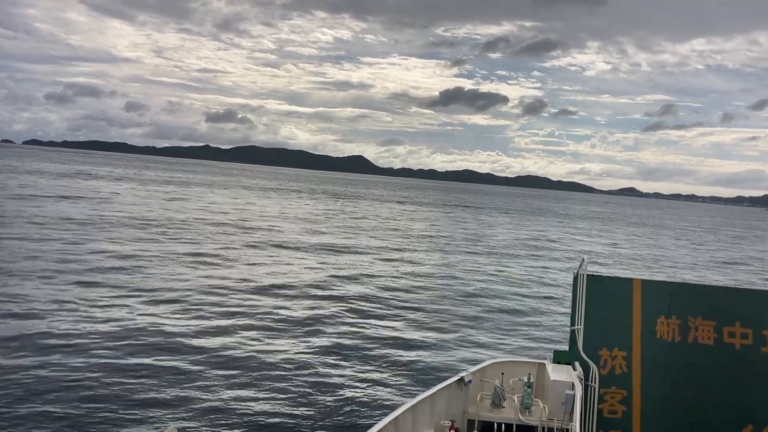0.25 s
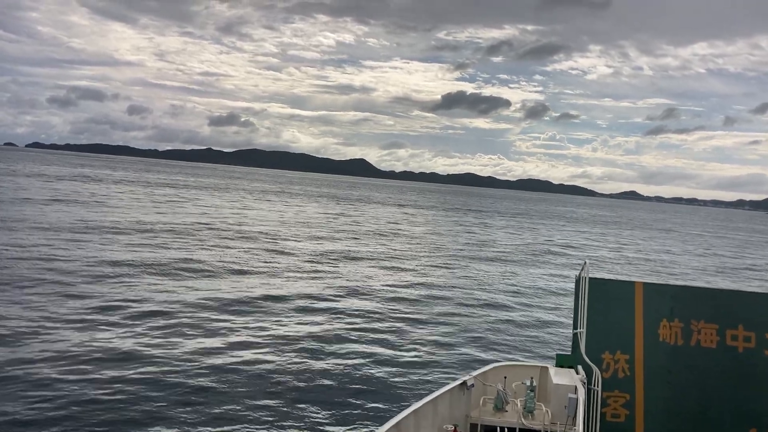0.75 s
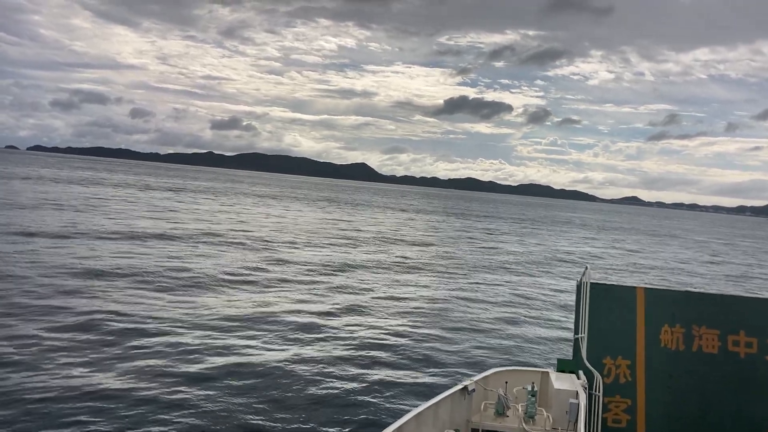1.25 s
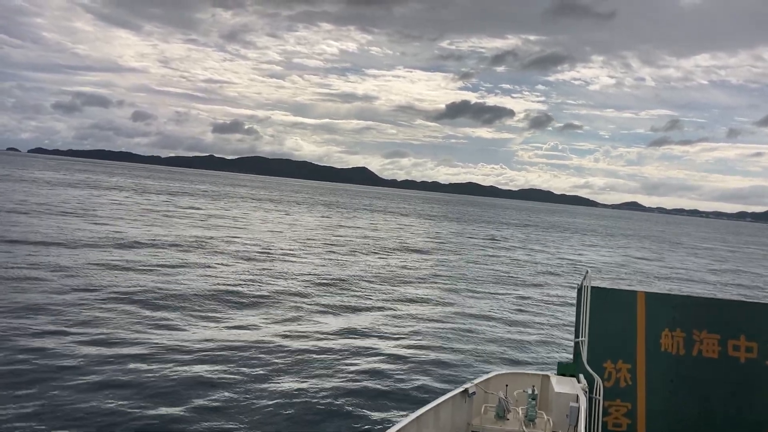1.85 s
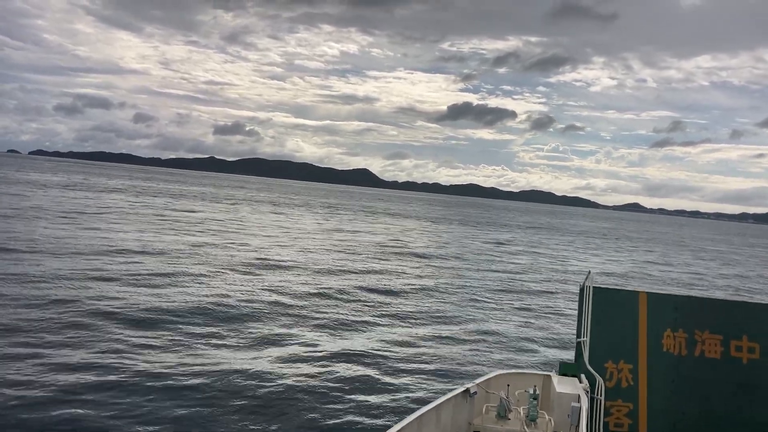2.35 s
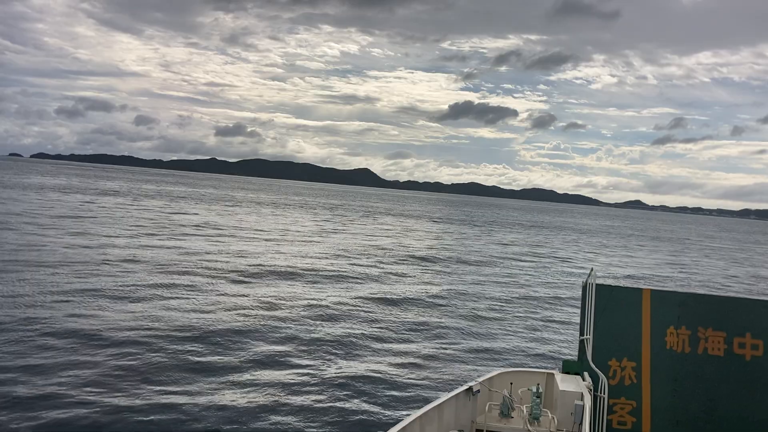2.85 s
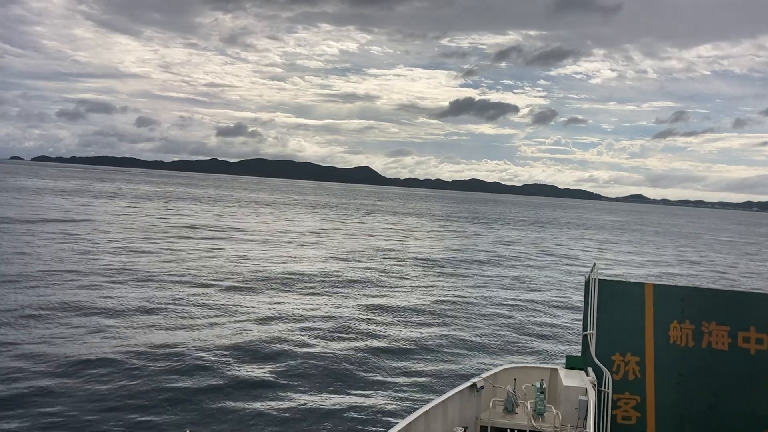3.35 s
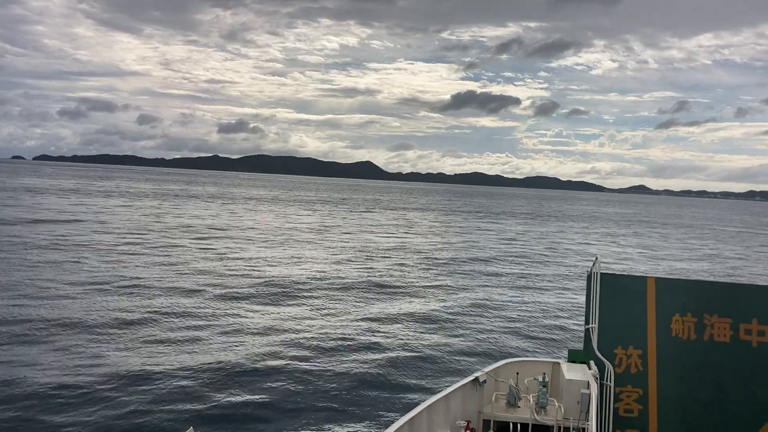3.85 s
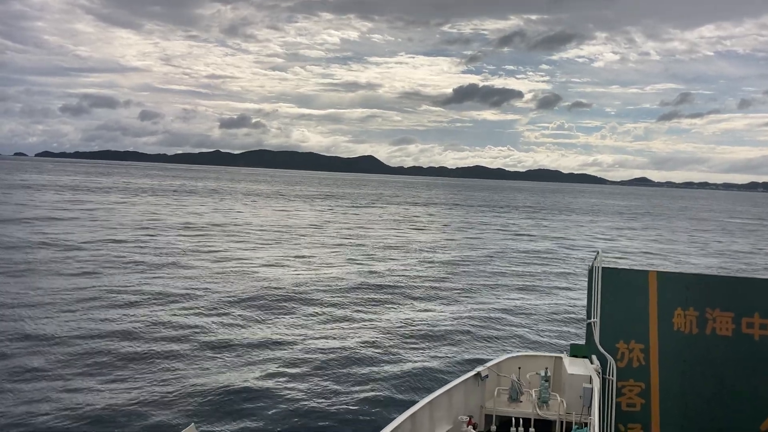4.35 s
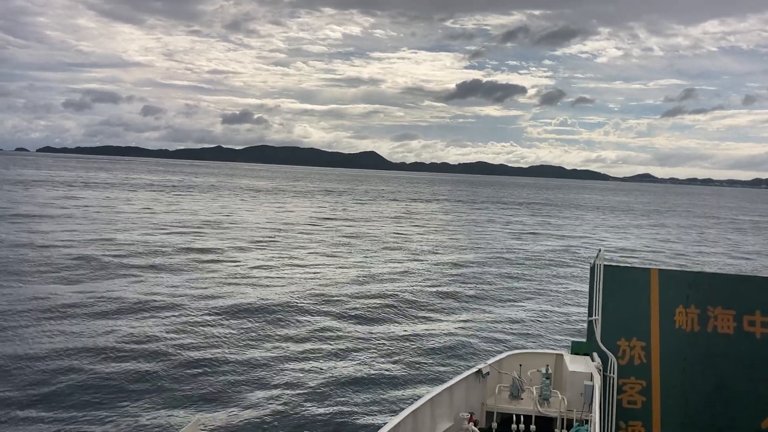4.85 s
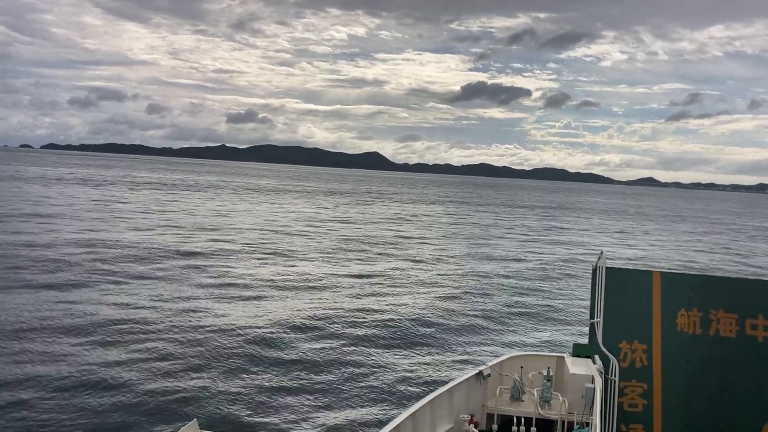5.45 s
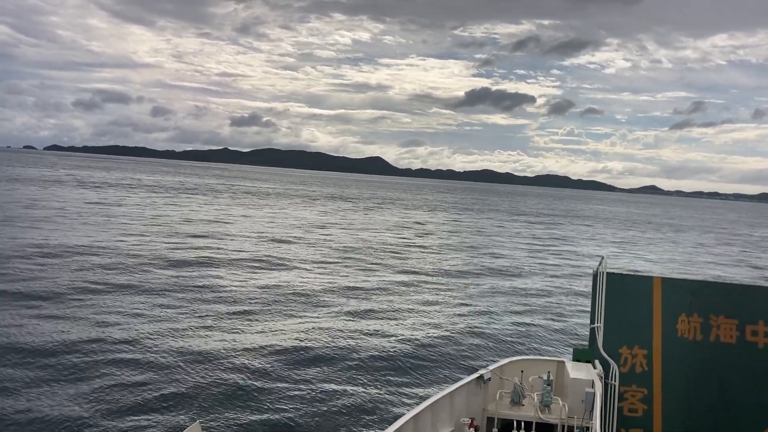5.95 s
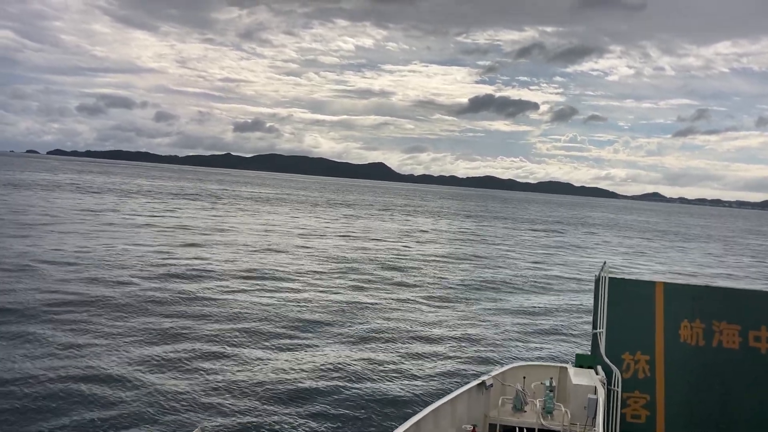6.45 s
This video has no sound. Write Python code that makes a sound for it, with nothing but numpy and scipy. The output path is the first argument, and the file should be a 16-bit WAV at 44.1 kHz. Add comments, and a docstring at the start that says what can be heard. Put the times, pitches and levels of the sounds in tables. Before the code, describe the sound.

Deep diesel ferry engine drones and chugs steadily with a slow throb, while water washes softly along the hull with faint hisses of spray.

```python
"""On the open deck of a ferry under way. A six-cylinder diesel drones and chugs through the funnel,
and its strongest tone beats against that of a faster generator set, which makes a throb.
Rough exhaust noise, shaped from random noise, and narrow fan and gear whines spread over the steel deck.
Bands of noise make the water washing along the hull, hisses of spray on the right and single splashes.
A blower holds a thin flickering tone, and there is one tiny squeak."""
import sys
import numpy as np
from scipy import signal
from scipy.fft import rfft, irfft
from scipy.io import wavfile
from scipy.ndimage import uniform_filter1d

SR = 44100
rng = np.random.default_rng(int(sys.argv[2]) if len(sys.argv) > 2 else 0)


def master(y):
    """Save y as 16-bit WAV."""
    cut = np.clip(np.atleast_2d(y).T, -1, 1)
    pcm = np.round(cut * 32767)  # scale
    wavfile.write(sys.argv[1], SR, pcm.astype(np.int16))


N = 295470
TIME_S = np.arange(N) / SR
BIN_HZ = np.arange(N // 2 + 1) * SR / N  # frequency of every spectral bin
EAR_LAG_S, EAR_SPACING_M, SOUND_SPEED_M_PER_S = .000269, 0.13, 343
TOP_HZ = 15500  # nothing is heard above this


def undb(db):
    """Turn decibels into a gain."""
    return 10 ** (np.asarray(db) / 20)


def colour(points):
    """Join (pitch_hz, level_db) points on a log pitch axis, giving dB for every bin."""
    hz, db = np.transpose(points)
    return np.interp(np.log(BIN_HZ + 1e-9), np.log(hz), db)


def walk(rate_hz):
    """Smooth random wandering with spread 1, changing about rate_hz times a second."""
    hold = int(SR / rate_hz)
    steps = np.repeat(rng.standard_normal(N // hold + 3), hold)
    smooth = uniform_filter1d(uniform_filter1d(steps, hold), hold)
    wander = smooth[rng.integers(hold):][:N]
    return wander / wander.std()


def swell(top_s, rise_s, fall_s):
    """A smooth bell-shaped rise to 1 and a fall back."""
    from_top = TIME_S - top_s
    return np.exp(-(from_top / np.where(from_top < 0, rise_s, fall_s)) ** 2)


def noise():
    """Spectrum of white noise at 0 dB per Hz."""
    return rfft(rng.standard_normal(N)) * np.sqrt(SR / 2)


def from_right(spectrum):
    """Sound from the right reaches the left ear a little later."""
    late = spectrum * np.exp(-2j * np.pi * BIN_HZ * EAR_LAG_S)
    return irfft(np.array([late, spectrum]), N)


def from_all_round(gain, likeness):
    """Noise from every direction: the ears agree best for waves much longer than their spacing."""
    alike = likeness * np.sinc(2 * BIN_HZ * EAR_SPACING_M / SOUND_SPEED_M_PER_S)
    shared = irfft(gain * noise() * np.sqrt((1 + alike) / 2), N)
    opposed = irfft(gain * noise() * np.sqrt((1 - alike) / 2), N)
    return np.array([shared + opposed, shared - opposed])


def squeak():
    """One tiny squeak: a short sine swell with a slightly wavering pitch."""
    hz = 3600 + 12 * walk(79)
    tone = np.sqrt(2) * np.sin(2 * np.pi * np.cumsum(hz) / SR)
    return undb(-62.5) * swell(5.856, rise_s=.0275, fall_s=.0275) * tone


def blower():
    """A thin tone of steady average pitch, broken up by the moving air separately at each ear."""
    hz, level_db, flicker_db, flickers_per_s = 2401, -69, 3, 25
    ears = []
    for _ in range(2):
        level = undb(level_db + flicker_db * walk(flickers_per_s))
        phase = 2 * np.pi * hz * TIME_S + .5 * walk(flickers_per_s)
        ears.append(level * np.sqrt(2) * np.sin(phase))
    return np.array(ears)


def whines(table, flare_db):
    """Narrow bands of noise that flare up and fade together on their way across the deck."""
    power = 0
    for hz, width_hz, level_db in table:
        peak = 1 / (1 + ((BIN_HZ - hz) / width_hz) ** 2) ** 2
        area_hz = peak.sum() * SR / N
        power = power + undb(level_db) ** 2 * peak / area_hz
    return from_all_round(np.sqrt(power), likeness=0.9) * undb(flare_db * walk(11))


# narrow whines of the generator's gears: (pitch_hz, width_hz, level_db rms before flaring)
GEAR_WHINES = [(1540, 10, -68.5), (1668, 6, -72), (1730, 12, -71), (1801, 5, -64.5), (1822, 10, -66),
               (1862, 22, -69), (2371, 5, -74), (3301, 4, -78)]


def gear_whines():
    """Whines of the generator's gears, each a narrow band of noise."""
    return whines(GEAR_WHINES, flare_db=2.4)


# narrow whines of the fans and their ducts: (pitch_hz, width_hz, level_db rms before flaring)
FAN_WHINES = [(459.5, 7.1, -48), (781.4, 9, -52.5), (791, 1.8, -58.5), (930, 3.5, -55), (952, 3.2, -55),
              (1064, 38, -58), (1292, 5, -71)]


def fan_whines():
    """Whines of the ventilation fans and ducts, steadier than the gears."""
    return whines(FAN_WHINES, flare_db=1.2)


def water(points, direct_hz):
    """Water noise: its top comes straight from the right, the lower part is scattered by the ship."""
    gain = undb(colour(points))
    direct_share = 1 / (1 + (direct_hz / (BIN_HZ + 1)) ** 4)
    direct = from_right(gain * np.sqrt(direct_share) * noise())
    scattered = from_all_round(gain * np.sqrt(1 - direct_share), likeness=0.7)
    return direct + scattered


# single splashes: (top_s, centre_hz, width_hz, level_db per Hz at the top, length_s)
SPLASHES = [(1.17, 3400, 1800, -91, .18), (2.15, 1900, 2400, -83.5, .45), (3.16, 7600, 2200, -94, .05),
            (3.22, 2400, 800, -87, .08), (3.77, 8200, 4500, -92, .045), (3.84, 7800, 3500, -95, .045),
            (4.24, 7200, 1200, -98, .035), (4.375, 7200, 1500, -94, .045), (5.45, 8000, 8000, -103, .22),
            (5.87, 6000, 8000, -101, .1)]


def splashes():
    """Single wavelets break against the hull, each hissing in its own band of noise."""
    fizz = water([(20, 0), (TOP_HZ, 0)], direct_hz=5300)
    out = 0
    for top_s, centre_hz, width_hz, level_db, length_s in SPLASHES:
        band = signal.lfilter(*signal.iirpeak(centre_hz, centre_hz / width_hz, fs=SR), fizz)
        power = swell(top_s, length_s / 2, length_s / 2)
        out = out + undb(level_db) * band * np.sqrt(power)
    return out


# hisses of spray: (top_s, level_db per Hz before colour and flicker, length_s)
SPRAY = [(0.0, -86.5, 0.11), (0.06, -96.5, 0.29), (1.86, -99, 0.33), (2.13, -91, 0.49), (2.62, -95.5, 0.34),
         (2.85, -97.5, .34)]
# colour added to the spray and mist: (pitch_hz, level_db)
SPRAY_COLOUR = [(700, 4), (1500, 8), (3000, 3.5), (4200, 3), (5500, 1.5), (7200, -1), (8500, -.5),
                (11000, 1.7), (15500, -4.5)]


def spray(grain_db, gust_db):
    """Clouds of fine droplets swell and fall back with a grainy hiss; a mist builds up late and stays."""
    rise_share = 0.52  # part of its length that a hiss spends rising
    mist_db, mist_from_s, mist_build_s = -103.5, 5.6, 1  # dB per Hz before colour
    power = undb(mist_db) ** 2 * np.clip((TIME_S - mist_from_s) / mist_build_s, 0, 1)
    for top_s, level_db, length_s in SPRAY:
        cloud = swell(top_s, rise_share * length_s, (1 - rise_share) * length_s)
        power = power + undb(level_db) ** 2 * cloud
    droplets = undb(grain_db * walk(400) + gust_db * walk(20))
    return water(SPRAY_COLOUR, direct_hz=5200) * np.sqrt(power) * droplets


# wash along the hull before it laps and eases: (pitch_hz, level_db per Hz)
WASH = [(600, -92), (1300, -83), (1750, -80.5), (2150, -83), (2600, -86), (3300, -91), (4200, -94.5),
        (5500, -96.5), (7000, -99.5), (8300, -102), (11000, -104), (15500, -114)]


def wash(lap_db, ripple_db):
    """Broken water along the hull laps and ripples unevenly, and eases once for a while."""
    lull_db = -1.5 * swell(4.08, rise_s=0.77, fall_s=0.77)
    unevenness_db = lap_db * walk(7.8) + ripple_db * walk(24.95)
    return water(WASH, direct_hz=5400) * undb(lull_db + unevenness_db)


def shaft_rpm():
    """Main engine speed: it holds its cruising speed, then slowly gains a little."""
    cruise_rpm, gain_from_s, gain_rpm_per_s = 537.5, 2.7, .6
    return cruise_rpm + gain_rpm_per_s * np.maximum(TIME_S - gain_from_s, 0)


# exhaust turbulence and hull rumble, before the direct and scattered levels: (pitch_hz, level_db per Hz)
RUMBLE = [(20, -70), (31, -49), (43, -42), (54, -39.5), (66, -40.5), (88, -42), (98, -39.5), (113, -45.5),
          (145, -45), (170, -46.5), (250, -49.5), (330, -52.5), (430, -56), (780, -60.5), (950, -67),
          (1200, -76.5), (2000, -100)]


def rumble(direct_db, scattered_db, pulse_db, repeat):
    """Turbulent exhaust and shaking plates, partly direct, partly off the deck; each firing pushes it."""
    # part of the plates' shaking comes back with every four-stroke cycle of two shaft turns
    cycle_s = 2 * 60 / shaft_rpm().mean()
    share = repeat * (BIN_HZ > 170)  # only the rumble above 170 Hz repeats with the cycle
    echo = np.abs(1 - share * np.exp(-2j * np.pi * BIN_HZ * cycle_s))
    gain = undb(colour(RUMBLE)) * np.sqrt(1 - share ** 2) / echo
    direct = undb(direct_db) * from_right(gain * noise())
    scattered = undb(scattered_db) * from_all_round(gain, likeness=0.57)
    firings = 3 * np.cumsum(shaft_rpm() / 60) / SR  # three in each shaft turn
    return (direct + scattered) * undb(pulse_db * np.cos(2 * np.pi * firings))


def shaft_lines(rpm, orders, unsteady, play):
    """Tones locked to a shaft; uneven combustion shakes their size and phase, the high ones more."""
    in_step_at_s = 3.232  # engine and generator push together here: the top of a throb
    angle = 2 * np.pi * np.cumsum(rpm / 60) / SR
    angle = angle - angle[int(in_step_at_s * SR)]
    loudest = max(orders, key=lambda row: row[1])[0]
    out = np.zeros(N)
    for multiple, level_db in orders:
        shake = unsteady * min(multiple / 12, 1) ** 2
        # the loudest line and its overtones are set to crest together; the others start anywhere
        start = rng.uniform(0, 2 * np.pi) * (multiple % loudest > 0)
        phase = multiple * angle + start + play * shake * walk(1.49)
        size = undb(level_db) * (1 + shake * walk(2.99))
        out += size * np.sqrt(2) * np.cos(phase)
    return out


# generator tones: (multiple of the shaft rate, level_db rms before shaking)
GENERATOR_ORDERS = [(3, -29), (3.5, -36), (5, -45), (6.5, -41), (9, -52), (13, -50), (15, -53), (30, -57)]


def generator():
    """The generator set turns faster than the main engine, at a fixed speed."""
    return shaft_lines(np.full(N, 1202.2), GENERATOR_ORDERS, unsteady=.2, play=2)  # rpm


# sliding exhaust tones in each engine cycle, from the deep surge up:
# (delay_s in the cycle, from_hz, to_hz, length_s, level_db rms before scatter and soft edges)
MOANS = [(0.180, 82.8, 76.5, 0.2, -23.2), (0.265, 112, 88, 0.09, -31), (0.150, 152, 113, 0.195, -24),
         (0.129, 168, 179, 0.085, -31), (0.009, 197, 166, 0.11, -35), (0.192, 215.5, 279, 0.13, -35),
         (0.035, 253, 222, 0.121, -35), (0.045, 375, 300, 0.1, -41)]


def moans(scatter_db):
    """Once every engine cycle the exhaust rings with sliding tones, mostly downward: the regular chug."""
    edge_s = .025  # each tone fades in and out over this
    cycles = np.cumsum(shaft_rpm() / 60 / 2) / SR  # two shaft turns make a cycle
    cycle_s = N / SR / cycles[-1]
    out = np.zeros(N)
    for delay_s, from_hz, to_hz, length_s, level_db in MOANS:
        turn, part = np.divmod(cycles - delay_s / cycle_s + 1, 1)
        age = part * cycle_s  # seconds since this tone began
        length = min(length_s, cycle_s)
        phase = 2 * np.pi * (from_hz * age + (to_hz - from_hz) * age ** 2 / (2 * length))
        edge = np.clip(np.minimum(age, length - age) / edge_s, 0, 1)
        sizes = undb(level_db + scatter_db * rng.standard_normal(int(cycles[-1]) + 2))
        size = sizes[turn.astype(int)]
        out += size * np.sin(np.pi / 2 * edge) ** 2 * np.sqrt(2) * np.sin(phase)
    return out


# main engine's exhaust and hull tones; 3 is the firing rate, 6 the loud drone:
# (multiple of the shaft rate, level_db rms before shaking and the uneven loudness)
ENGINE_ORDERS = [(3.0, -36), (4.5, -35), (5.0, -43), (5.5, -39), (6.0, -16), (7.0, -34), (10.5, -43),
                 (12.0, -37), (12.5, -43), (18.0, -40), (22.5, -47), (24.0, -49), (28.0, -48), (28.5, -46),
                 (29.0, -47), (30.0, -49), (34.0, -50), (36.5, -50), (38.5, -52), (39.5, -49), (41.0, -51),
                 (42.0, -49), (43.5, -50), (51.0, -50)]
# uneven loudness of the drone as heard amid the rumble, before an overall trim: (time_s, level_db)
DRONE_LOUDNESS = [(0, 0.2), (.7, .7), (1.5, 0.1), (2.1, 0.5), (2.8, 1.8), (3.25, 1.5), (3.46, -2.5),
                  (3.7, 2.7), (4.1, -0.8), (4.4, 1), (4.65, 0), (5.3, 0.6), (6.2, -0.5), (6.7, 1.5)]


def engine():
    """The main engine's tones, heard with uneven loudness."""
    loudness_db = np.interp(TIME_S, *np.transpose(DRONE_LOUDNESS)) - 0.5  # overall trim
    return shaft_lines(shaft_rpm(), ENGINE_ORDERS, unsteady=.12, play=.8) * undb(loudness_db)


def machinery():
    """Engine, chug and generator; the strongest lines, a few hertz apart, make the throb."""
    drone = engine() + moans(scatter_db=0.6) + generator()
    left = np.interp(TIME_S - EAR_LAG_S, TIME_S, drone)  # heard a little later
    return np.array([left, drone])


def scene():
    """Air, water and machinery at the two ears."""
    air = fan_whines() + gear_whines() + blower()
    sea = wash(lap_db=.55, ripple_db=.6) + spray(grain_db=1.2, gust_db=.7) + splashes()
    ship = rumble(direct_db=-6.0, scattered_db=-10.0, pulse_db=.45, repeat=0.45) + machinery()
    return squeak() + air + sea + ship


def record(dry):
    """The right ear hears more bass than the left; the ends are eased and the top is cut."""
    bass_hz, fade_s = 170, .004
    bass = signal.sosfilt(signal.butter(1, bass_hz, fs=SR, output="sos"), dry)
    bass_db = np.array([[-1.5], [1.5]])  # left, right
    sound = dry + (undb(bass_db) - 1) * bass
    fade = np.clip(np.minimum(TIME_S, TIME_S[-1] - TIME_S) / fade_s, 0, 1)
    top_cut = signal.ellip(10, .1, 80, TOP_HZ, fs=SR, output="sos")
    return signal.sosfilt(top_cut, sound * fade)


dry = scene()
out = record(dry)
master(out)
```